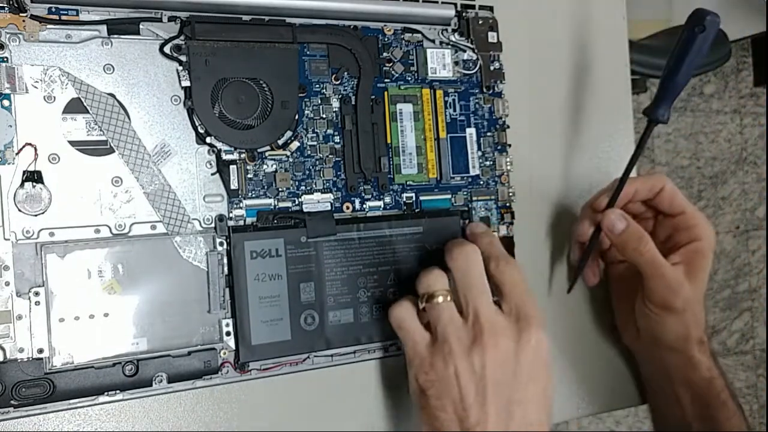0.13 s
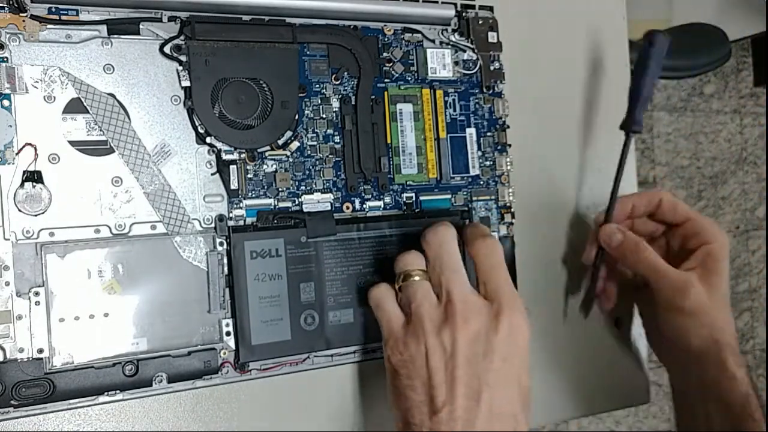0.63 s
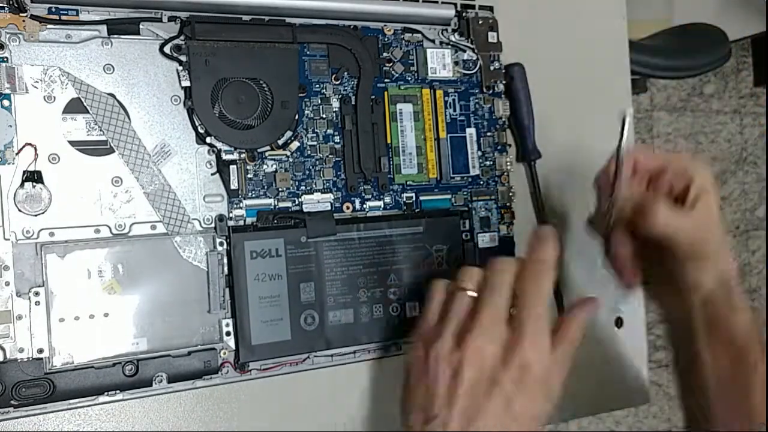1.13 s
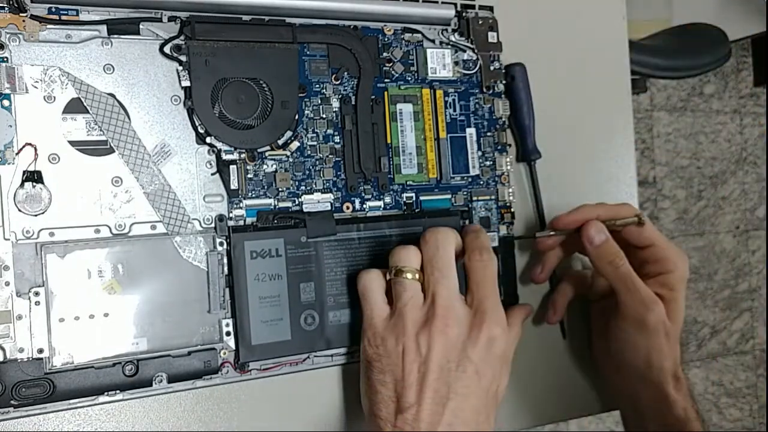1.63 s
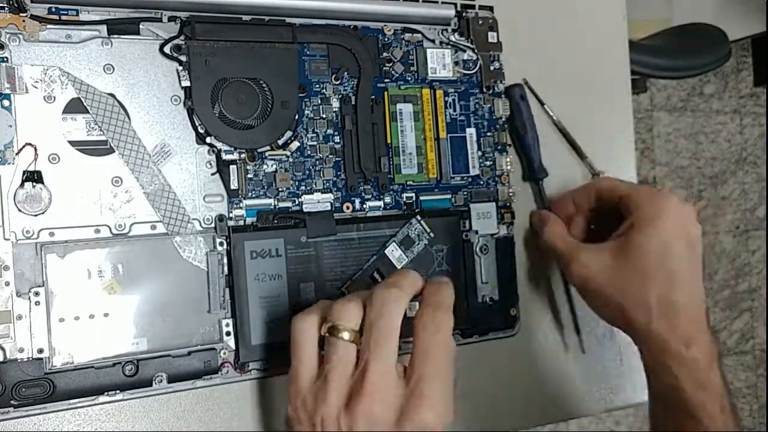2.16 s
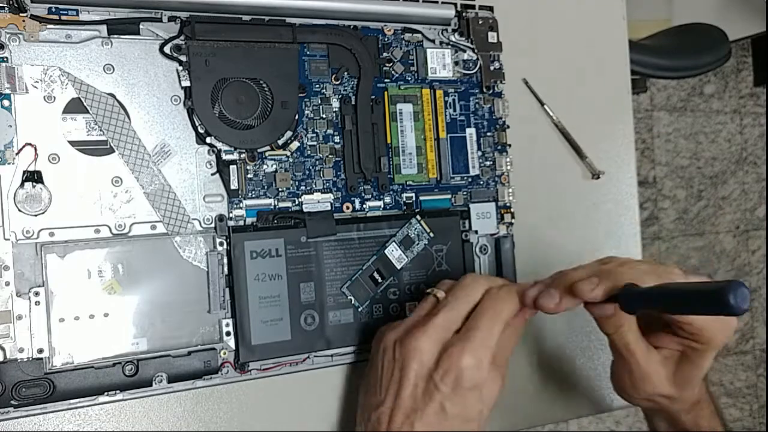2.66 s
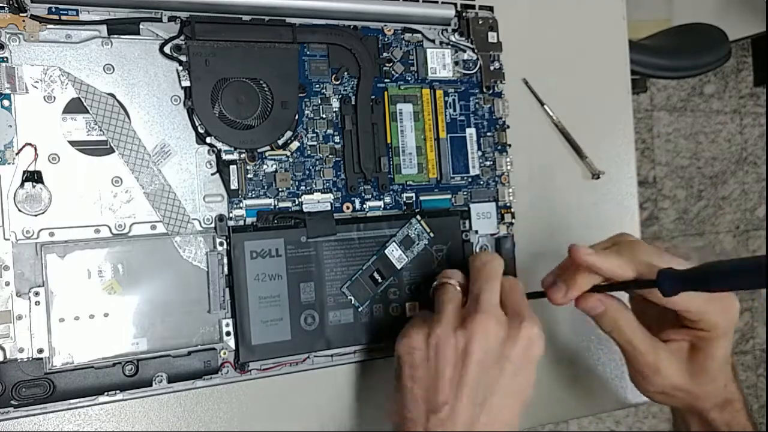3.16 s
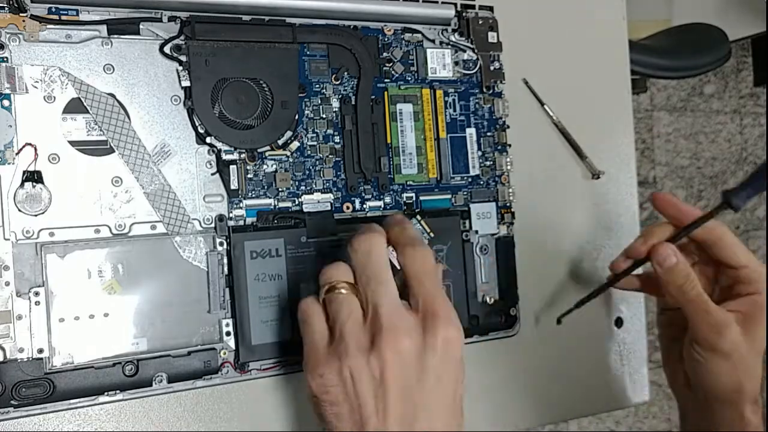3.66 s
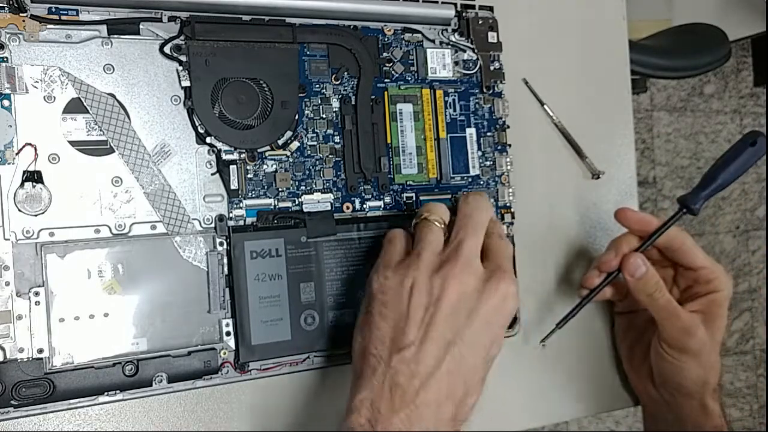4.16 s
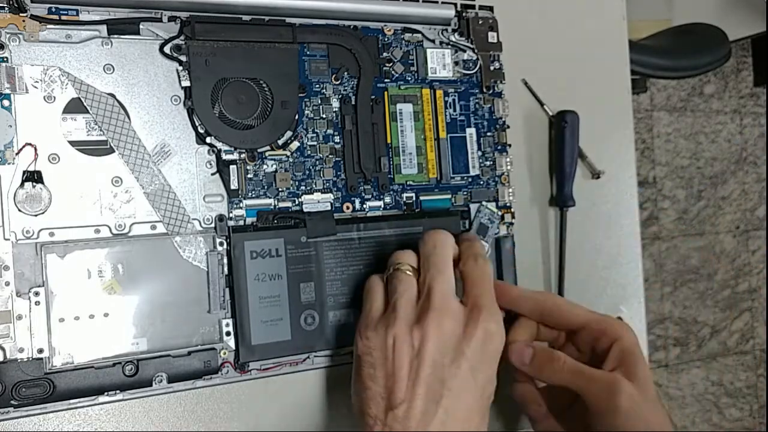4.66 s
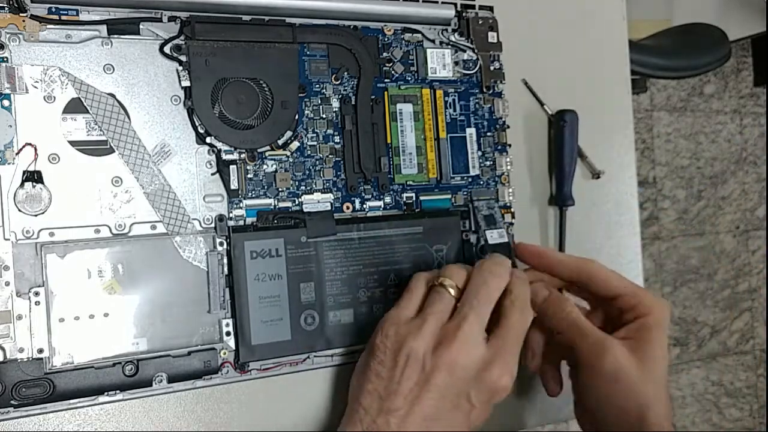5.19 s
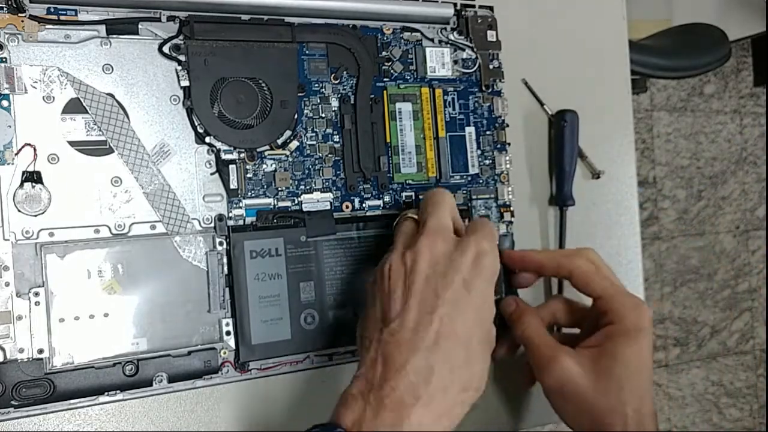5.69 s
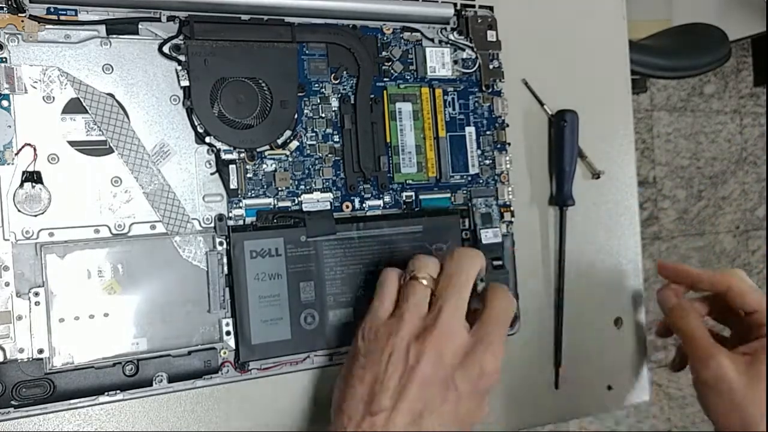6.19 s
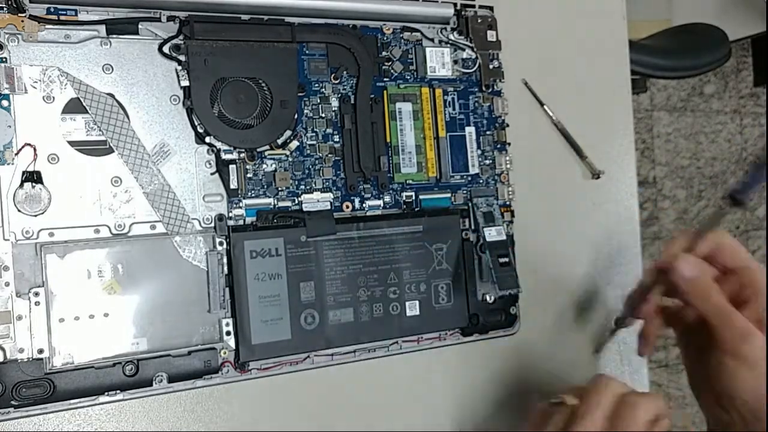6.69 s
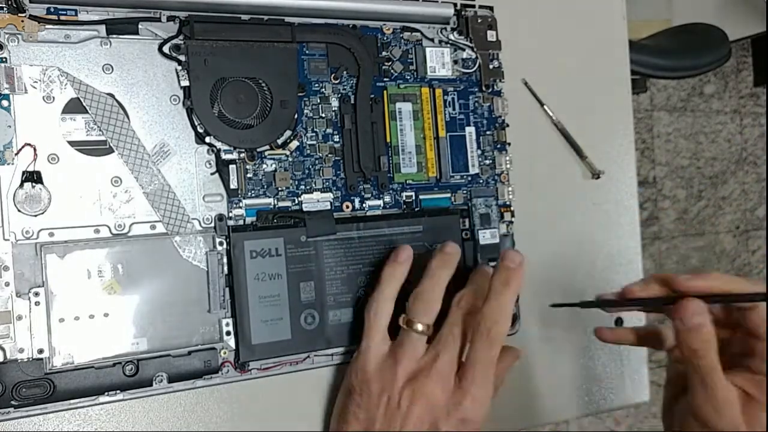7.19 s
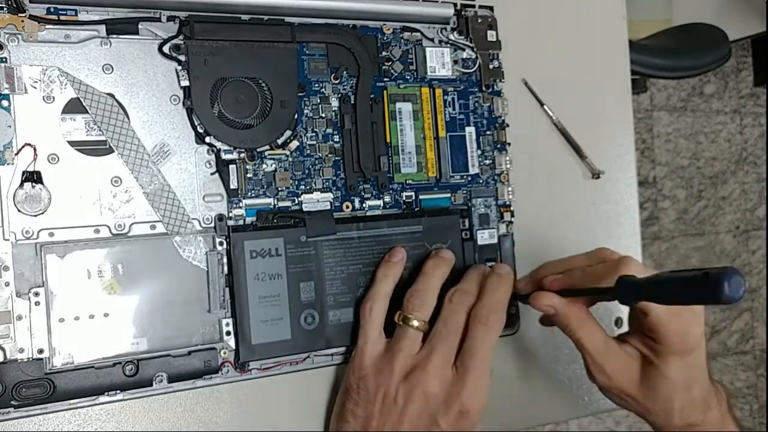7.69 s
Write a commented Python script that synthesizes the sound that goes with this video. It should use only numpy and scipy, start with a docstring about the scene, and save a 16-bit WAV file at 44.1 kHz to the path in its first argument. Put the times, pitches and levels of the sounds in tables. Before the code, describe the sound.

Close metallic knocks, small ticks and dull desk thuds come in scattered bursts, grainy and time-squeezed, above a quiet uneven room hiss.

```python
"""A desk with an open laptop chassis, heard close up on a stereo phone, over an uneven hiss that starts louder.
Dull thuds come through the desk at once, then something small bounces four times. From 0.76 s screwdrivers
knock, a hollow handle rings and a tiny screw ticks; faint far blips join at 1.3 s and more thuds follow.
Fast motion at its own pitch smears each blow into a noise swell around a sharp core, differently in each ear;
blows are noise through metal modes, the other bumps short swelling sines, the hiss speckled noise."""
import sys
import numpy as np
from scipy import signal
from scipy.fft import rfft, irfft
from scipy.io import wavfile
from scipy.ndimage import uniform_filter1d

SR = 44100
rng = np.random.default_rng(int(sys.argv[2]) if len(sys.argv) > 2 else 0)


def master(y):
    """Save y as 16-bit WAV."""
    cut = np.clip(np.atleast_2d(y).T, -1, 1)
    pcm = np.round(cut * 32767)  # scale
    wavfile.write(sys.argv[1], SR, pcm.astype(np.int16))


def level_to_linear(level):
    """Convert decibel levels to linear amplitude factors, elementwise."""
    exponent = np.asarray(level, float) / 20
    return 10 ** exponent


N = 345611
SIZE = 8192  # samples in the buffer of one blow or bump
EARS = np.array([[1], [-1]])  # left, right


def along(table, hz):
    """Reads a (frequency [Hz], value) table on a log-frequency axis."""
    table_hz, values = np.transpose(table)
    return np.interp(np.log(hz + 1), np.log(table_hz), values)


def add(out, x, s):
    """Mixes x into out with its middle at time s."""
    i = int(s * SR) - x.shape[1] // 2
    a, b = max(i, 0), min(i + x.shape[1], N)
    out[:, a:b] += x[:, a - i:b - i]


def swell(ms):
    """Times (s) around the middle of a buffer and a raised-cosine swell of this full length."""
    t = (np.arange(SIZE) - SIZE // 2) / SR
    return t, np.cos(np.pi * np.clip(t / (ms / 1000), -.5, .5)) ** 2


# Tools and parts on desk and chassis, close by; the panel answers low, the steel high:
# (time [s], panel level [dB], panel pitch [Hz], steel level [dB],
#  brightness = top band over the one below [dB], share of the sharp core [0-1])
KNOCK_EVENTS = [(0.763, -41, 1950, -41, -8, .03), (0.769, -25, 1660, -27.5, -20.5, 0.22),
                (0.799, -35, 2130, -45, -17.5, 0.1), (0.828, -27.5, 925, -38, -1.5, 0.3),
                (0.862, -28, 933, -49, -3, 0.26), (1.074, -47.5, 913, -42, -4, 0.13),
                (1.095, -53, 890, -41, -9, 0.4), (1.944, -62, 855, -57.5, 19, 0.87),
                (2.13, -37, 1970, -31, 1.5, 0), (2.154, -25, 1720, -27.5, -4.5, .38),
                (2.181, -43.5, 1960, -41.5, -13, 0.1), (2.224, -49.5, 907, -75.5, 9.5, 0.23),
                (2.262, -33.5, 1043, -42.5, -8, 0.3), (2.56, -41, 2125, -44, -3, 0.81),
                (2.735, -49, 896, -53.5, 2.5, 0.43), (3.144, -54.5, 1052, -67, -3, 0.92),
                (3.794, -55.5, 2140, -57.5, 15, 0.2), (4.019, -45, 908, -43.5, -4, 0.46),
                (4.412, -64, 1080, -59, -17, .03), (4.419, -32.5, 1310, -30.5, -12.5, 0.04),
                (4.453, -51, 1200, -41, 0.5, 0), (4.472, -56.5, 920, -40, 12, 0.5),
                (4.528, -48, 1950, -42.5, 1.5, 0.3), (4.54, -30, 1870, -25.5, -11, 0.08),
                (4.568, -45, 2470, -43, -15, 0.05), (4.742, -46, 2340, -46, -2.5, 0.37),
                (5.97, -33.5, 2750, -42, -4, 0.66), (5.98, -34, 2470, -35.5, -8.5, 0.51),
                (6.205, -46.5, 954, -61, -6, 0.88), (7.684, -39, 2290, -51, 9.5, 0.63)]


def knocks():
    """Tools knock the desk and chassis: a panel and a steel shaft ring together."""
    out = np.zeros((2, N))
    shaft_hz = 4330
    for s, panel_db, panel_hz, steel_db, bright_db, core in KNOCK_EVENTS:
        add(out, blow(panel_db, panel_hz, steel_db, shaft_hz, bright_db, core), s)
    return out


# The screw and the tool tips, close by, hardly moving a panel:
# (time [s], steel level [dB], ring pitch [Hz], brightness [dB], share of the sharp core [0-1])
TICK_EVENTS = [(0.92, -66.5, 7000, -11, .02), (0.948, -55.5, 6750, -28, 0.6), (1.177, -71.5, 7550, 5, .25),
               (2.469, -65.5, 6330, 11, 0.7), (2.611, -54.5, 3990, -1, 1), (3.207, -73, 6280, 2, 0.45),
               (3.32, -42.5, 4390, 2.5, 0.33), (3.604, -71, 9500, 14, 0.7), (3.837, -58.5, 4180, -7, .1),
               (3.857, -63, 3960, -2, 0.05), (4.09, -77, 7900, 8, .2), (4.278, -71.5, 4350, -4, .2),
               (4.709, -67, 3490, -10, .4), (5.01, -69, 7600, 15, 0.3)]


def ticks():
    """Small steel parts ring at their own pitch, with the panel weak beneath them."""
    out = np.zeros((2, N))
    panel_below_db, panel_hz = -18, 1660
    for s, steel_db, steel_hz, bright_db, core in TICK_EVENTS:
        add(out, blow(steel_db + panel_below_db, panel_hz, steel_db, steel_hz, bright_db, core), s)
    return out


# How the phone's ports hear the desk: (frequency [Hz], left minus right [dB])
DESK_PAN = [(60, -4.5), (110, -4), (200, -7.5), (380, -16), (700, 7.5), (1290, -2.5), (2380, -5.5),
            (4400, -3), (8120, -3.5), (15000, -0.5)]


def blow(panel_db, panel_hz, steel_db, steel_hz, bright_db, core):
    """One blow: a noise push excites the metal, its level set in four bands and in each ear."""
    hz = np.arange(SIZE // 2 + 1) * SR / SIZE
    # the panel's pitch shares it between the two low bands
    even_hz, db_per_octave = 1501, 15.5
    high_db = db_per_octave * np.log2(panel_hz / even_hz)
    levels_db = np.array([panel_db + min(0, -high_db), panel_db + min(0, high_db),
                          steel_db + min(0, -bright_db), steel_db + min(0, bright_db)])
    loudest_db = levels_db.max()
    # the panel also rings this far above a low pitch or below a high one
    partner_hz = panel_hz * 2.097 ** np.sign(even_hz - panel_hz)

    body = metal(hz, (panel_hz, partner_hz, steel_hz), loudest_db)
    bands = band_filters(hz)
    size = np.sqrt((np.abs(body[:, None] * bands) ** 2).sum(axis=2) / len(hz))
    colour = (level_to_linear(levels_db) / size) @ bands

    # light taps fall on the chassis to the left, hard blows on the desk
    pan_db = np.interp(loudest_db, [-65, -40], [5.5, -1.5])
    colour = colour * level_to_linear(EARS * (pan_db + along(DESK_PAN, hz)) / 2)
    # with its phases lost, each ring spreads to both sides of the blow
    sound = irfft(push_spectrum(core) * np.abs(body) * colour)
    return sound * np.sqrt(SR * 0.03)  # levels hold over 30 ms


def push_spectrum(core):
    """The force of a blow: a sharp core with a short room tail, and the swell that fast motion smears."""
    t, window = swell(56.7)
    after = t >= 0
    noise = rng.standard_normal((4, 2, SIZE))
    crack = noise[0] * after * np.exp(-np.abs(t) / 0.0022)
    grain = level_to_linear(20 * uniform_filter1d(noise[3], size=40))  # the swell is grainy on a 1 ms scale
    smear = noise[1] * grain * window * np.exp(-np.abs(t) / 0.023)
    tail_t60_s, tail_db = 0.068, -8
    tail = noise[2] * after * np.exp(-np.log(1000) * np.abs(t) / tail_t60_s)
    crack, smear, tail = (v / np.linalg.norm(v, axis=1, keepdims=True) for v in (crack, smear, tail))
    sharp = crack + level_to_linear(tail_db) * tail
    push = rfft(np.sqrt(core) * sharp + np.sqrt(1 - core) * smear)
    # the smear scatters phases and leaves the colour alone: the push keeps an even spectrum
    return push / np.sqrt(uniform_filter1d(np.abs(push) ** 2, size=40))


# Metal modes of the panels and tools: (frequency [Hz], width [Hz], level [dB])
MODES = [(865, 130, -4), (979, 69.2, -0.5), (1080, 43, -12), (1310, 270, -3.5), (1497, 53, -4.5),
         (1660, 23, -7.5), (1950, 118.2, -3.5), (2033, 110, -1), (2279, 120, 1.5), (2470, 190, -2.5),
         (2794, 59, -7), (3106, 240, -7.5), (3490, 450, -7), (3980, 120, -10), (3910, 82.2, -0.5),
         (4230, 520, -3.5), (4140, 260, 1.5), (4690, 570, -1.5), (5260, 81, -3.5), (5530, 120, -1),
         (6080, 220, -1), (6410, 84, -10), (6750, 230, -6.5), (7550, 330, -14), (7900, 220, -9.5),
         (9500, 270, -9.5)]
# Rings woken by every blow: (frequency [Hz], share of the lift [0-1])
SHARED_RINGS = [(900, .7), (1450, .3), (3600, .3), (6200, 0.2)]


def metal(hz, pitches_hz, loudest_db):
    """Response of the resonant metal; the place of the blow favours modes near its pitches."""
    f, width, db = np.transpose(MODES)[:, :, None]
    modes = level_to_linear(db) * 1j * hz * width / (f ** 2 - hz ** 2 + 1j * hz * width)

    def nearness(at_hz):
        return np.exp(-(np.log(f / at_hz) / 0.0518) ** 2)

    near = sum(share * nearness(at_hz) for at_hz, share in SHARED_RINGS)
    near = np.minimum(near + sum(nearness(at_hz) for at_hz in pitches_hz), 1)
    # hard blows shake every mode, so the favoured ones stand out less
    lift_db = np.interp(loudest_db, [-45, -30], [17, 5])
    # each ear hears its own mix of modes
    mix = level_to_linear(lift_db * near + 3 * rng.standard_normal((2, len(MODES), 1)))
    mix = mix * rng.choice([-1, 1], mix.shape)
    crack_colour = 0.63 * hz / (hz + 5000) / (1 + 1j * hz / 8000)  # the unresonant part, mostly treble
    body = (mix * modes).sum(axis=1) + crack_colour
    # a power above 1 deepens the valleys between the rings of light taps
    return np.abs(body) ** np.interp(loudest_db, [-45, -32], [1.4, 1.0])


# Edges of the four bands in which a blow's levels are set: (frequency [Hz])
BAND_EDGES = [650, 1700, 3300, 7000, 15750]


def band_filters(hz):
    """Gains of the four bands, crossing over steeply at their edges."""
    above = [1 / (1 + (edge / (hz + 1)) ** 14) for edge in BAND_EDGES]
    bands = np.array([np.sqrt(np.maximum(a - b, 0)) for a, b in zip(above, above[1:])])
    bands[0] += (1 - above[0]) * hz / BAND_EDGES[0]  # a little of the blow reaches below the lowest band
    bands[-1] *= hz < BAND_EDGES[-1]  # nothing passes above the top edge
    return bands


# The hollow handle meeting the desk: (time [s], level [dB], length [ms])
HANDLE_RINGS = [(0.773, -36.5, 28), (0.827, -34.5, 36), (0.868, -37.5, 55), (2.164, -38, 40),
                (4.423, -34.5, 16), (4.543, -35.5, 34)]


def handle():
    """The hollow handle rings at one pitch as it meets the desk, stronger on the right."""
    out = np.zeros((2, N))
    for s, db, ms in HANDLE_RINGS:
        add(out, bump(393.5, db, ms, pan_db=-7.5), s)
    return out


# Dull thuds through the desk: (time [s], pitch [Hz], level [dB], length [ms])
THUD_EVENTS = [(0.002, 190, -31.5, 22), (0.013, 170, -39, 25), (0.015, 357, -50.5, 64),
               (0.021, 90, -45, 35), (0.031, 163, -38.5, 54), (0.061, 159, -41, 23), (0.078, 190, -47, 12),
               (2.554, 194, -53, 14), (3.672, 134.5, -50, 28), (4.014, 180, -51, 9.3),
               (5.239, 122, -41.5, 20), (5.985, 267, -49, 34), (5.987, 168, -37, 18.4),
               (6.068, 147, -57, 25), (6.203, 130, -51, 20), (7.679, 130, -53, 34)]


def thuds():
    """The desk carries low, dull thuds: short swelling bass tones."""
    out = np.zeros((2, N))
    for s, hz, db, ms in THUD_EVENTS:
        add(out, bump(hz, db, ms, pan_db=-1.5), s)
    return out


def bounces():
    """Something small bounces four times, each flight shorter and each landing weaker."""
    out = np.zeros((2, N))
    s, flight_s, db = 0.408, 0.0255, -49.5
    for _ in range(4):
        add(out, bump(1530, db, 6.8, pan_db=-18.5), s)
        s += flight_s
        flight_s *= 0.73
        db -= 4.5
    return out


# Faint far blips: (time [s], pitch [Hz], level [dB], left minus right [dB])
BLIP_EVENTS = [(1.307, 585, -61.5, -19), (1.375, 635, -64.5, -23), (3.374, 583, -63, -17),
               (4.277, 1324, -61.5, -17), (4.857, 1187, -60.5, -16), (5.104, 1326, -58.5, -16),
               (5.795, 684, -55.5, -11.5), (5.795, 1380, -60, -9), (5.912, 646, -62, 17),
               (6.0, 647, -58.5, 18), (6.095, 1200, -64, -15), (6.917, 1310, -58.5, -11),
               (7.18, 627, -62.5, -11.5)]


def blips():
    """Faint far tones swell and fade within 35 ms, most of them on the right."""
    out = np.zeros((2, N))
    for s, hz, db, pan_db in BLIP_EVENTS:
        add(out, bump(hz, db, 35, pan_db), s)
    return out


def bump(hz, db, ms, pan_db):
    """A mode and a weaker partner under a swell, pitch a little unsteady; the ears agree only in the bass."""
    t, window = swell(ms)
    drift, start, spread, partner_start = rng.standard_normal(4)
    phase = 2 * np.pi * hz * t * (1 + 1.76 * drift * t)
    lead = spread * min(hz / 1700, 1) * EARS
    mode = np.sin(phase + lead + 2 * start)
    partner = 0.39 / (1 + (hz / 800) ** 4) * np.sin(1.3 * phase - lead + 2 * partner_start)
    return 2 * (mode + partner) * window * level_to_linear(db + EARS * pan_db / 2)


# Colour of the room hiss: (frequency [Hz], relative density [dB per Hz])
HISS_COLOUR = [(25, -18.5), (40, -18.5), (75, 0.5), (182, -2.5), (221, -6), (650, -8.5), (959, -12),
               (1270, -9.5), (1600, -10.5), (1780, -18.5), (2280, -15), (3580, -24), (4450, -20),
               (5300, -30.5), (8700, -38.5), (15600, -37.5)]
# Side of the room hiss: (frequency [Hz], left minus right [dB])
HISS_PAN = [(60, -0.5), (110, -2.5), (200, -3), (380, -3), (700, -7.0), (1290, -9.5), (2380, -5.5),
            (4400, -8.5), (8120, -3), (15000, 2.5)]


def room():
    """Quiet speckled hiss, alike left and right only in the bass, starting louder and settling."""
    hz = np.arange(N // 2 + 1) * SR / N
    # (frequency [Hz], likeness of the ears [0-1])
    likeness = [(30, 0.82), (60, 0.74), (130, 1.0), (290, 0.78), (640, 0.23), (1400, 0.017)]
    alike = np.clip(along(likeness, hz), 0, 1)
    mid, side = rfft(speckle(rng.standard_normal((2, N)), 3))
    hiss = np.sqrt(1 + alike) * mid + EARS * np.sqrt(1 - alike) * side
    hiss = irfft(hiss * level_to_linear(along(HISS_COLOUR, hz) + EARS * along(HISS_PAN, hz) / 2), N)
    hiss = hiss / np.sqrt(np.mean(hiss ** 2))
    level_db, start_db, settle_s = -56, 6.5, 0.59
    return hiss * level_to_linear(level_db + start_db * np.exp(-np.arange(N) / SR / settle_s))


def speckle(x, db):
    """Fast motion rebuilds the sound from 46 ms pieces: each narrow band flickers alone, as faint short tones."""
    cells = signal.stft(x, nperseg=2048)[2]
    chance = rng.standard_normal(cells.shape)
    chance = uniform_filter1d(chance, size=3, axis=1) * np.sqrt(3)  # evened over three neighbouring bins
    return signal.istft(cells * level_to_linear(db * chance), nperseg=2048)[1][:, :N]


def scene():
    """Blows and bumps close to the phone, far blips, and the room beneath."""
    return knocks() + ticks() + handle() + thuds() + bounces() + blips() + room()


def top_cut(x):
    """Nothing passes above the cut-off."""
    return signal.sosfilt(signal.butter(12, 15780, fs=SR, output="sos"), x)


def record(dry):
    """A steep low-pass ends the treble of the finished mix at 15.7 kHz."""
    low_pass = signal.ellip(10, .2, 70, 15700, fs=SR, output="sos")
    mix = signal.sosfilt(low_pass, dry)
    return top_cut(mix)


dry = scene()
out = record(dry)
master(out)
```